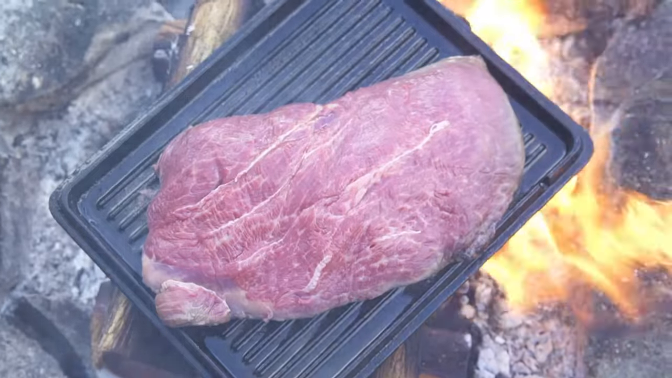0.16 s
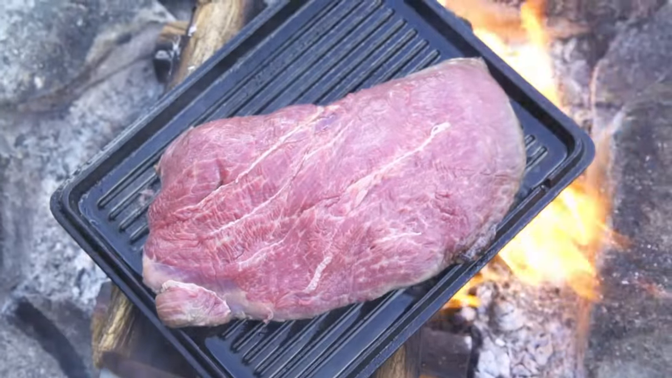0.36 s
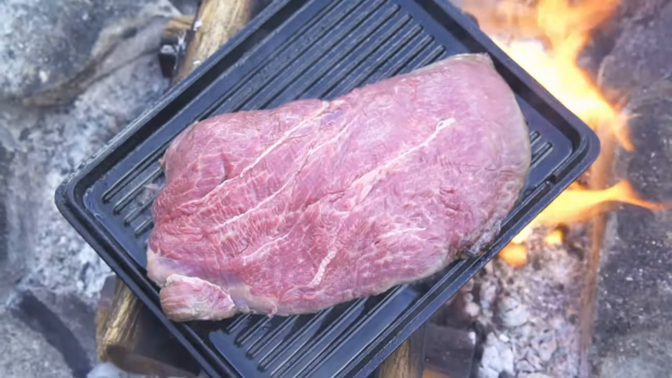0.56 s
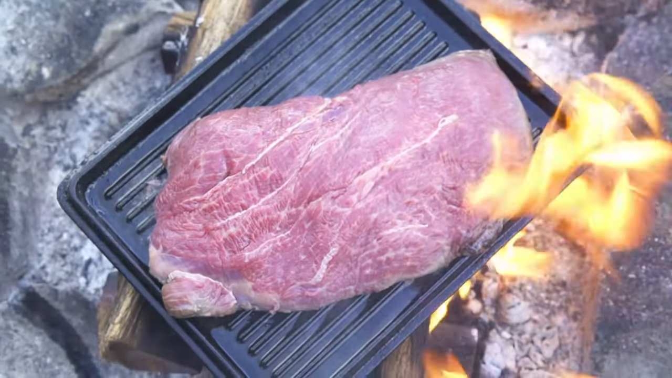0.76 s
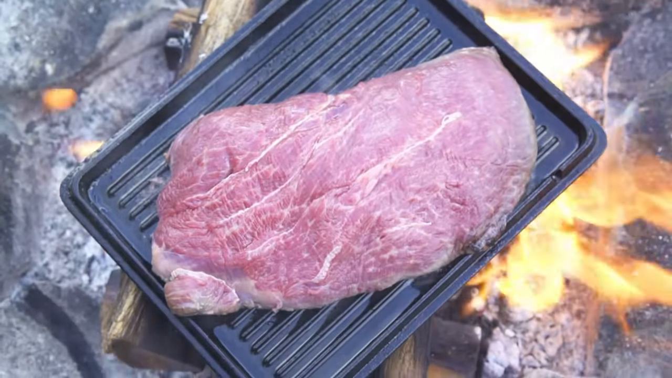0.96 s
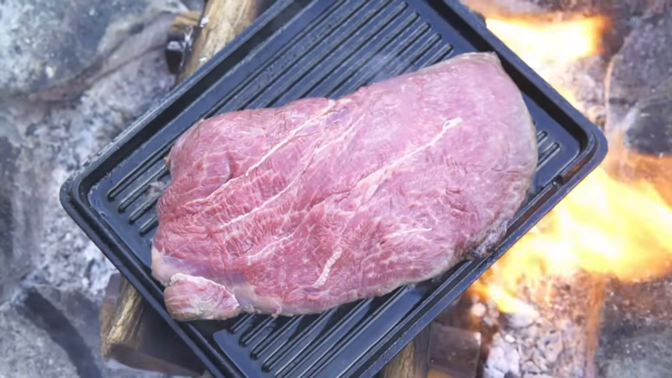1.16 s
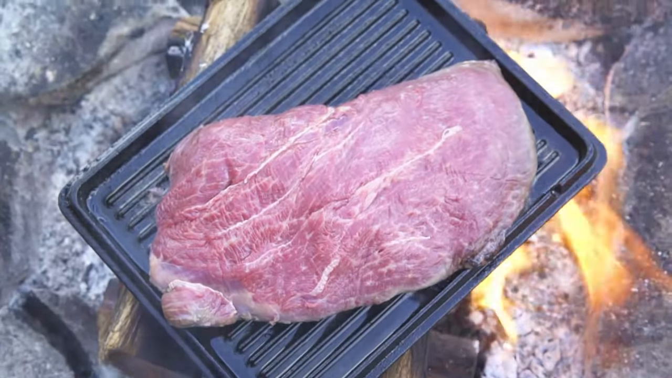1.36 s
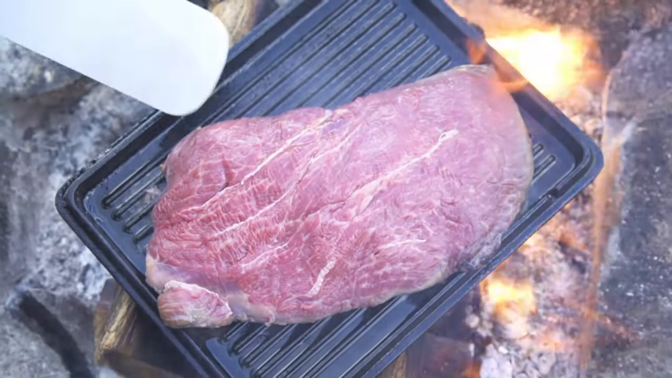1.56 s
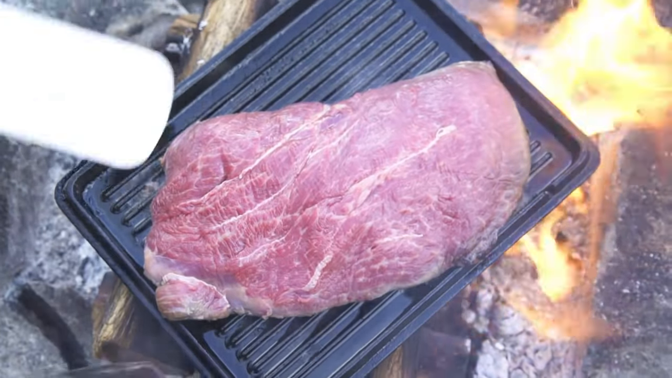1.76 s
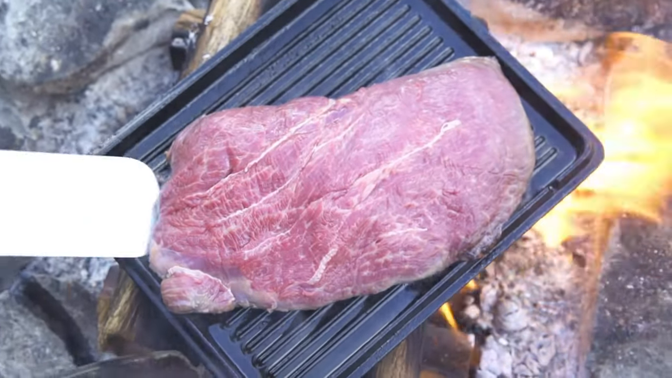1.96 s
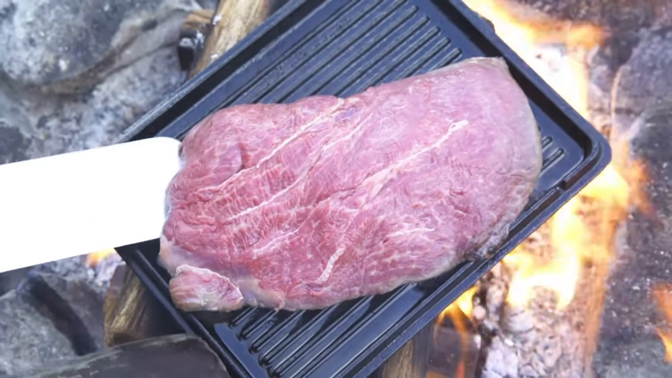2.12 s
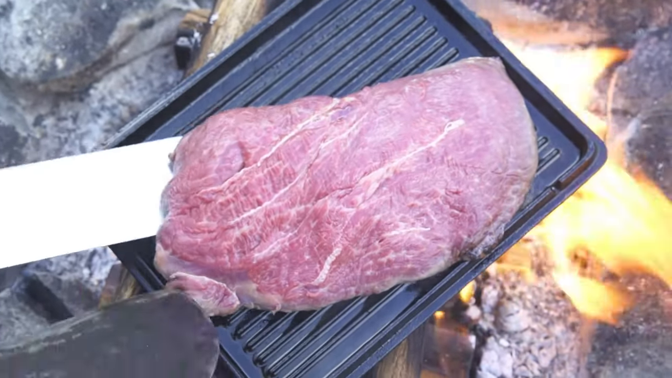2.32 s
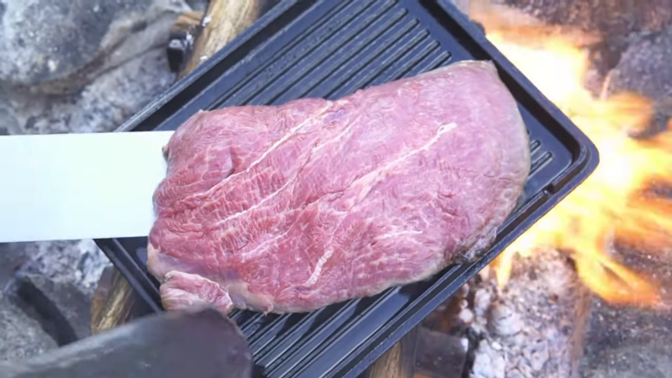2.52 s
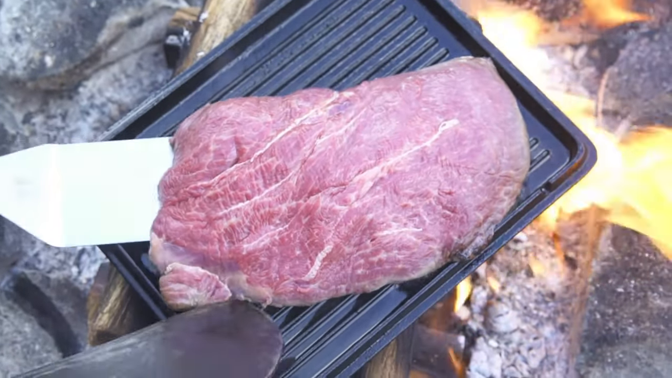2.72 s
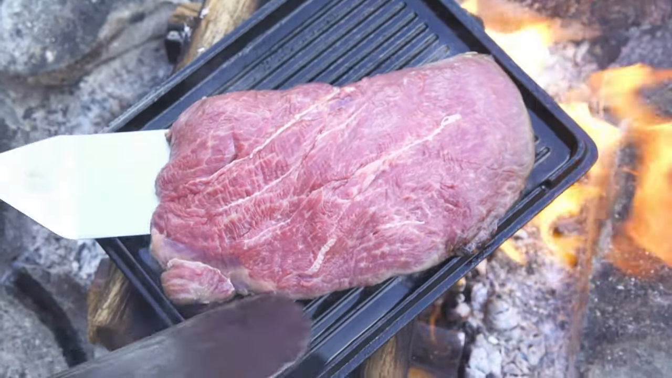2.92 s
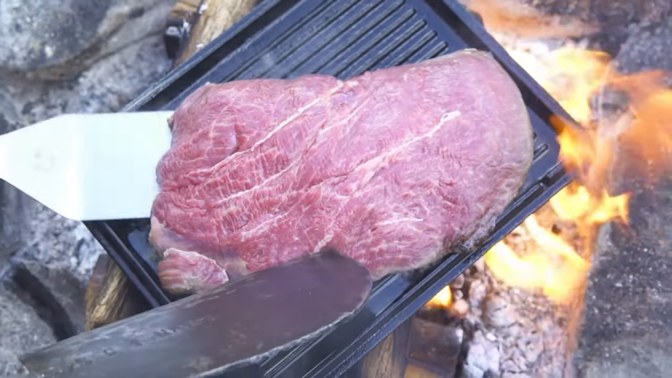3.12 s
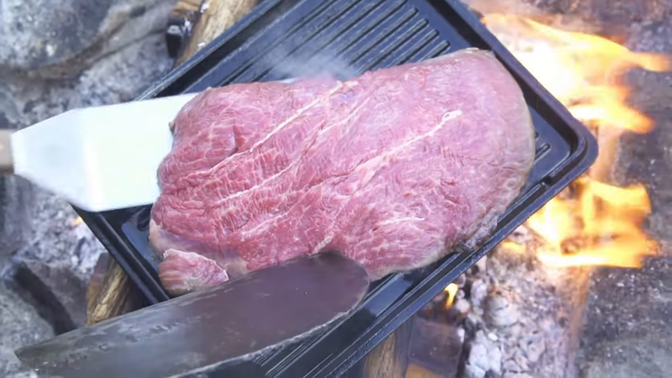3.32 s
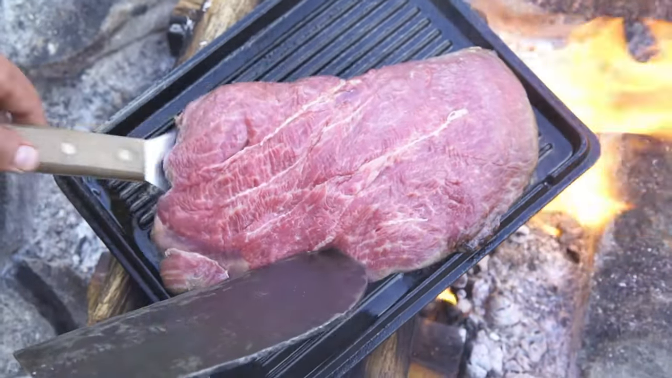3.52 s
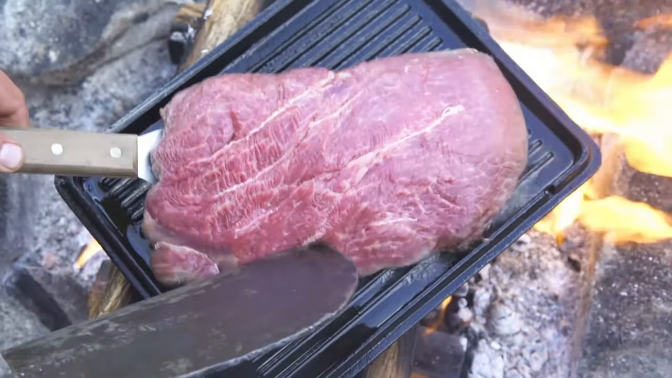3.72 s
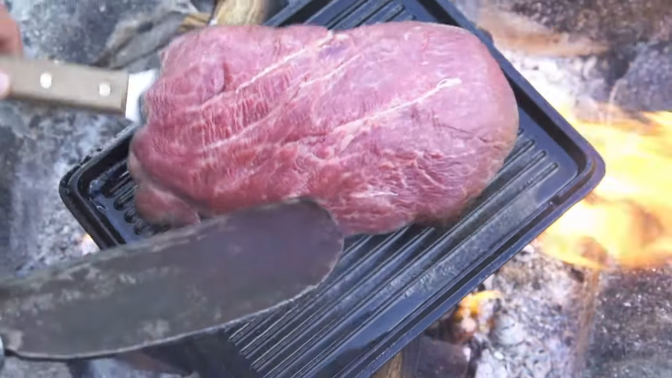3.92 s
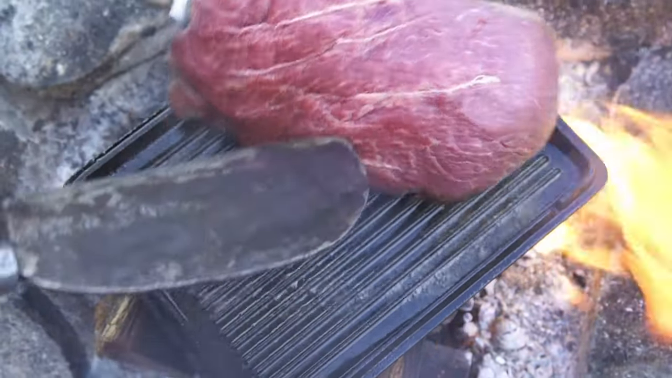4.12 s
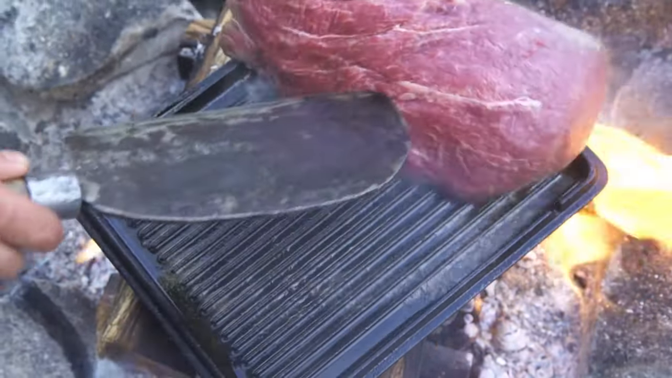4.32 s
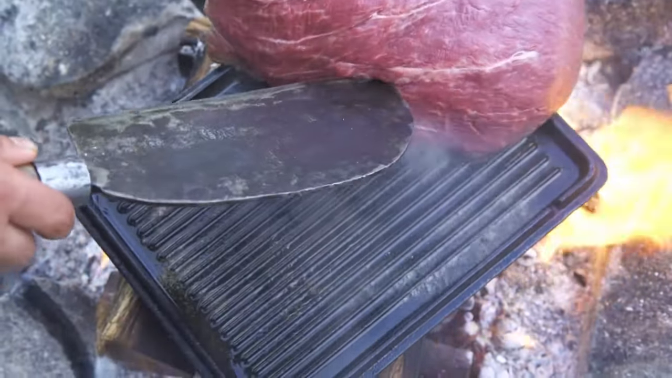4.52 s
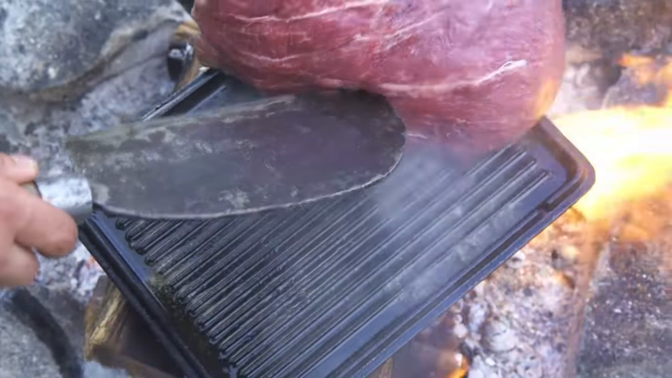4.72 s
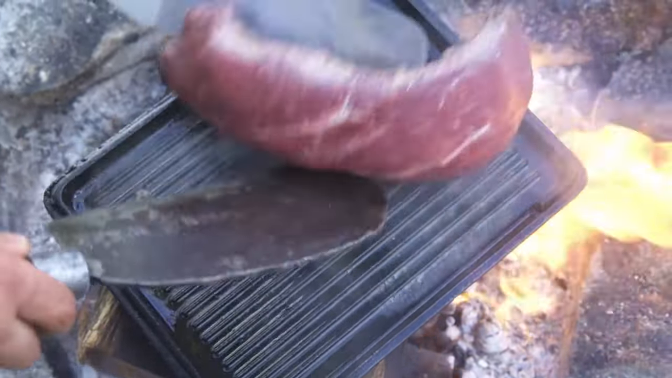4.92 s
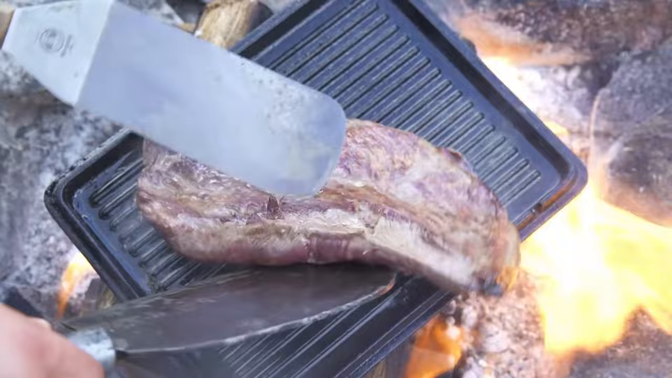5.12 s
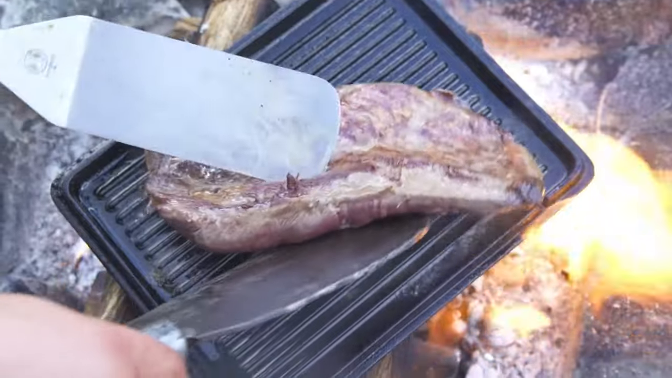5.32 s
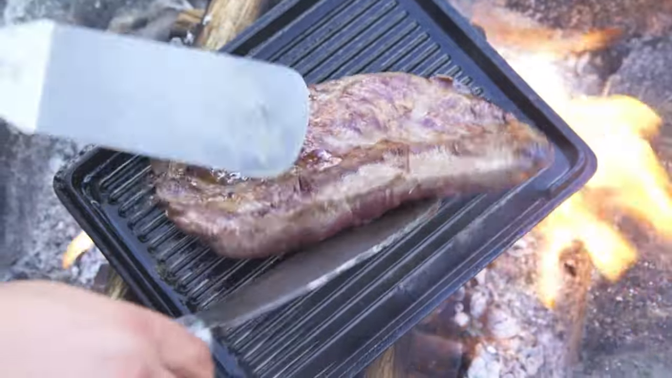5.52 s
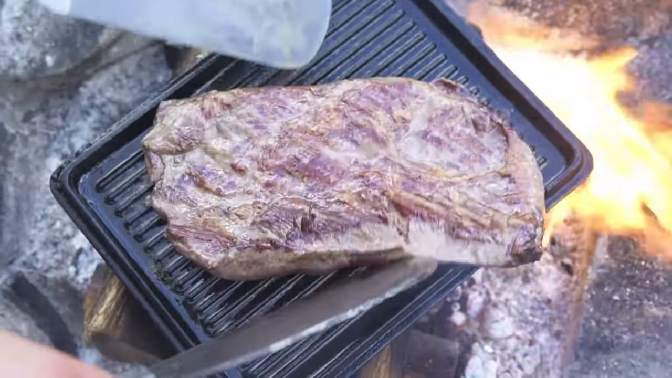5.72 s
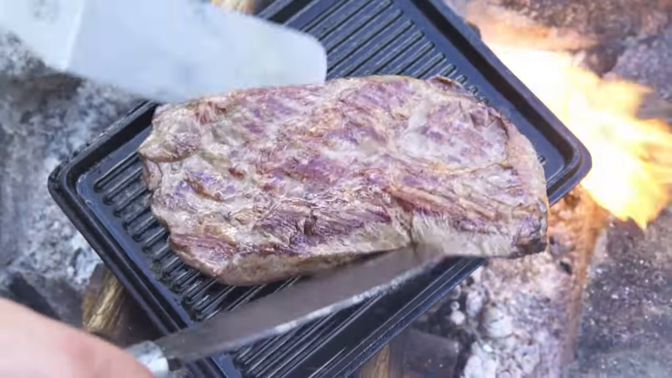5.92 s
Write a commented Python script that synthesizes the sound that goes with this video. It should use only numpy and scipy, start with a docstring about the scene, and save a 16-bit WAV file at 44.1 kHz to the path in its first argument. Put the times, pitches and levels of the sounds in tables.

```python
"""At a campfire, a steak sizzles on a ridged iron pan: tiny steam bursts in the fat, with louder pops
among them and short jets of steam from under the meat. A steel spatula and a knife scrape and knock
on the pan and turn the steak over; the wet side lands and spits harder.
The flames rumble underneath, with ticking embers and a few dull knocks."""
import sys
import numpy as np
from scipy import signal
from scipy.fft import rfft, irfft, next_fast_len
from scipy.io import wavfile
from scipy.ndimage import map_coordinates

SR = 44100
rng = np.random.default_rng(int(sys.argv[2]) if len(sys.argv) > 2 else 0)


def transcribe(u):
    """Save the signal u as a 16-bit wav file named by the first command-line argument.

    u: samples, shape (n,) or (channels, n), limited to [-1, 1]; the rate is SR.
    q: integer samples, one column per channel.
    """
    v = np.clip(np.atleast_2d(u).T, -1, 1)
    q = np.round(v * 32767).astype(np.int16)
    wavfile.write(sys.argv[1], SR, q)


N = 267642
TIME = np.arange(N) / SR
DROPLET_HZ = 6950  # usual pitch of a bursting droplet
# how hard the pan fries: (time [s], crackle level [dB], fizz level [dB], bubbling level [dB])
FRYING_LEVELS = [(0.08, -41, -40.5, -40), (0.11, -43.5, -49, -46), (0.28, -33.5, -43, -55),
                 (0.46, -37, -44.5, -53), (0.66, -36, -41.5, -42), (0.73, -42.5, -49, -40),
                 (0.85, -35.5, -43.5, -46), (1.66, -37, -42.5, -41), (1.86, -36.5, -37.5, -33.5),
                 (2.09, -36.5, -40, -43), (3.39, -33.5, -39, -37), (4.21, -37.5, -42, -41),
                 (5.01, -33.5, -36.5, -32.5), (5.41, -30.5, -34, -31.5), (5.53, -32, -37, -37.5),
                 (5.66, -26.5, -39, -34), (5.76, -34.5, -44, -30.5), (6.06, -32.5, -45, -33)]


def amp(db):
    """Decibels to gain."""
    return 10 ** (np.asarray(db) / 20)


def unit(x):
    """Scale to rms 1."""
    return x / np.sqrt(np.mean(x ** 2) + 1e-20)


def curves(rows):
    """Breakpoint envelopes, one for each column after the time."""
    times, *columns = np.transpose(rows)
    return [np.interp(TIME, times, column) for column in columns]


def wobble(rate):
    """A smooth random curve, rate knots a second."""
    return map_coordinates(rng.standard_normal(4096), [TIME * rate], mode="wrap")


def swell(start, end):
    """A rounded rise and fall between two times."""
    return np.sqrt(np.abs(np.sin(np.pi * np.clip((TIME - start) / (end - start), 0, 1))))


def coloured(x, points):
    """Minimum-phase EQ through (Hz, dB) points, so that clicks keep their sharp attack."""
    size = 2 * next_fast_len(N // 2 + 4096)
    hz, db = np.transpose(points)
    gain = amp(np.interp(np.log(np.fft.rfftfreq(size, 1 / SR) + 1), np.log(hz), db))
    cepstrum = irfft(np.log(gain))
    cepstrum[1:size // 2] *= 2
    cepstrum[size // 2 + 1:] = 0
    return irfft(rfft(x, size) * np.exp(rfft(cepstrum)))[:N]


def resonance(x, hz, q):
    """One resonant band-pass, with Q no lower than 0.5."""
    return signal.lfilter(*signal.iirpeak(min(hz, SR / 2 - 1000), max(q, .5), SR), x)


def add(track, start, sound):
    """Mix a sound in at a start time in seconds."""
    part = track[max(round(start * SR), 0):][:len(sound)]
    part += sound[:len(part)]


def bursts(count, hz, scatter, cycles, range_db):
    """A swarm of tiny bursts, each a quickly damped sine: many faint, few strong."""
    when, size, life = rng.random((count, 3)).T
    onsets = (when * N).astype(int)
    pitch = np.broadcast_to(hz, N)[onsets] * np.exp(scatter * rng.standard_normal(count))
    db = range_db * np.tanh(-np.log(1 - size) / 6)
    age = np.arange(128)
    turns = np.clip(pitch, 300, 16000)[:, None] * age / SR
    decay = np.exp(-turns / (cycles * (.5 + life[:, None])))
    grains = rng.choice([-1, 1], (count, 1)) * amp(db)[:, None] * np.sin(2 * np.pi * turns) * decay
    return np.bincount((onsets[:, None] + age).ravel(), grains.ravel(), N)[:N]


def fire():
    """Flames rumble low and flutter more the harder they burn; the embers tick faintly."""
    # a calm burn, harder as the steak is turned: (time [s], level [dB])
    burn = [(0.1, -57.5), (1.5, -51.5), (3.4, -57.5), (5.4, -46), (6.06, -48)]
    # flames flaring up: (start [s], end [s], boost [dB])
    flares = [(0.552, 0.74, 6), (0.93, 1.156, 5), (1.186, 1.443, 8.5), (4.44, 4.58, 4.5)]
    # low body of the flames: (frequency [Hz], gain [dB])
    rumble_eq = [(15, -2.5), (30, -17), (50, -0.5), (75, 1.5), (120, 2), (200, -6.5), (400, -24.5),
                 (1000, -27.5)]
    # their midrange flapping: (frequency [Hz], gain [dB])
    flutter_eq = [(80, -10), (200, -3), (310, -2), (480, -5), (750, -11.5), (1100, -12.5), (2000, -9),
                  (5000, -49.5)]
    # ticking of the embers: (time [s], level [dB])
    ember_levels = [(0, -53.5), (2.5, -48), (3.8, -51.5), (6, -56.5)]
    licks_db = wobble(rate=8)
    flame_db = curves(burn)[0] + licks_db + sum(db * swell(start, end) for start, end, db in flares)
    rumble = unit(coloured(rng.standard_normal(N), rumble_eq) * amp(0.85 * wobble(22)))
    flutter = unit(coloured(rng.standard_normal(N), flutter_eq) * amp(2.54 * wobble(30)))
    ticks = bursts(count=5000, hz=1515, scatter=0.39, cycles=0.97, range_db=19.5)
    embers = amp(curves(ember_levels)[0]) * unit(resonance(ticks, 2430, q=0.5))
    return amp(flame_db + 2.1) * rumble + (amp(-52) + 0.36 * amp(flame_db)) * flutter + embers


def knocks():
    """Dull blows: a brief push into one well-damped resonance."""
    # knocks around the pan and the fire: (time [s], peak [dB], pitch [Hz], t60 [s])
    blows = [(0.477, -33.5, 328, 0.12), (1.114, -27.5, 1030, 0.047), (1.114, -27.5, 570, 0.015),
             (1.685, -28.5, 303, 0.089), (2.329, -18, 1950, 0.0071), (2.512, -27, 960, 0.046),
             (2.565, -42, 430, 0.039), (3.117, -32.5, 226, 0.07), (4.006, -29.5, 220, 0.039),
             (4.424, -23.5, 410, 0.0076), (4.463, -37, 510, 0.058), (4.547, -35, 804, 0.032),
             (5.279, -24, 2440, 0.0052), (5.777, -40, 234, 0.05)]
    out, t = np.zeros(N), TIME[:SR // 5]
    attack = 1 - np.exp(-t / 0.0004)
    for start, db, hz, t60 in blows:
        rattle = unit(resonance(rng.standard_normal(len(t)), hz, q=0.98))
        body = (np.sin(2 * np.pi * hz * t) + 0.38 * rattle) * amp(-60 * t / t60) * attack
        add(out, start, amp(db) * body / np.abs(body).max())
    return out


def pan_ring(damping):
    """The pan's answer to one blow, a new mix of modes each time; more damping shortens the ring."""
    # pan and blade ringing together: (frequency [Hz], level [dB], t60 at damping 1 [s])
    modes = [(687, -2, 0.073), (775, -10, 0.063), (992, -4, 0.11), (1218, -2.5, 0.17), (1342, 3, 0.14),
             (1460, 3, 0.053), (1843, 3, 0.12), (1970, -14, .1), (2020, -8, 0.058), (2266, 7, 0.17),
             (2820, 2, 0.068), (3210, -4, 0.033), (3360, 10, 0.1), (3460, 0.5, 0.18), (4050, 5, 0.093),
             (4660, -23, .08), (5330, 17, 0.065), (5300, -10, 0.065)]
    t = TIME[:SR // 4]
    hz, db, t60 = np.transpose(modes)[:, :, None]
    envelopes = amp(db + rng.standard_normal(db.shape) - 60 * damping * t / t60)
    return np.sum(rng.choice([-1, 1], db.shape) * envelopes * np.sin(2 * np.pi * hz * t), axis=0)


def scrapes():
    """Steel sticks and slips on the ridges, rasping and ringing the pan."""
    # blades rubbing over iron and meat:
    # (start [s], end [s], level [dB], centre [Hz], sharpness [Q], ringing share [0-1])
    strokes = [(0.18, 0.273, -45.5, 650, 0.45, 0), (0.464, 0.526, -44.5, 550, 0.69, 0.3),
               (1.128, 1.303, -45.5, 470, 0.88, 0.05), (1.24, 1.303, -39.5, 900, 0.44, 0.36),
               (1.556, 1.803, -48.5, 397, 0.82, 0.3), (1.767, 1.955, -43.5, 1150, 1.3, 0.65),
               (1.795, 1.99, -36, 3240, 0.74, 0.5), (1.883, 1.984, -40, 2180, 0.8, 0.85),
               (2.156, 2.337, -46, 2020, 3.4, .1), (2.34, 2.415, -38.5, 1840, 1.8, 0),
               (2.458, 2.637, -38, 1230, 0.44, 0.2), (2.463, 2.63, -41.5, 458, 1.3, 0.18),
               (2.738, 2.794, -44.5, 700, 0.36, 0.2), (3.198, 3.287, -48, 484, 3, 0.04),
               (3.39, 3.507, -39.5, 1830, 1.1, 0.5), (3.515, 3.63, -44.5, 1510, 1.1, 0.95),
               (4.643, 4.738, -46, 400, 0.45, 0.15), (5.16, 5.24, -43, 1920, 2.1, 0.2),
               (5.87, 6.04, -37.5, 3140, 1.9, 0.3), (5.886, 6.035, -44.5, 1800, 8.4, 0.5),
               (5.887, 6.03, -45.5, 692, 12, 0.8)]
    slips = bursts(count=7000, hz=2740, scatter=0.71, cycles=0.21, range_db=1)
    slips = unit(slips * amp(3 * wobble(70)))
    # the moving edge touches the pan at changing places, so the mix of modes shifts
    place = 1.18 * wobble(20)
    ringing = sum(weight * signal.fftconvolve(slips, pan_ring(damping=2))[:N]
                  for weight in (np.cos(place), np.sin(place)))
    out = np.zeros(N)
    for start, end, db, hz, q, share in strokes:
        envelope = swell(start, end)
        for source, weight in ((slips, np.sqrt(1 - share)), (ringing, np.sqrt(share))):
            rasp = envelope * resonance(resonance(source, hz, q), hz, q)
            out += amp(db) * weight * rasp * np.linalg.norm(envelope) / np.linalg.norm(rasp)
    return out


def taps():
    """Steel strikes the pan with a crack and a ring; a slower contact leaves out the high modes."""
    # blade hits: (time [s], ring peak [dB], contact cut-off [Hz], crack gain [dB])
    hits = [(2.106, -15.5, 3100, -10), (2.129, -21, 1680, -6), (3.194, -31, 4500, 19.5),
            (3.242, -32, 4500, 18), (5.349, -37, 450, -24), (5.543, -35, 445, -31)]
    out = np.zeros(N)
    for start, db, contact_hz, crack_db in hits:
        contact = signal.butter(2, contact_hz, fs=SR)
        ring = signal.lfilter(*contact, pan_ring(damping=0.88))
        noise = rng.standard_normal(len(ring)) * amp(crack_db - 60 * TIME[:len(ring)] / 0.046)
        crack = signal.lfilter(*contact, resonance(noise, 3800, q=0.96))
        add(out, start, amp(db) * (ring / np.abs(ring).max() + crack))
    return out


def steam_jets():
    """Trapped steam forces its way out in a dense chain of bubbles around one pitch."""
    # squirts from under the meat: (start [s], end [s], level [dB], pitch [Hz])
    jets = [(3.317, 3.423, -33.5, 7600), (4.094, 4.142, -29.5, 7200), (5.155, 5.257, -32, 3830),
            (5.327, 5.436, -27.5, 8400), (5.62, 5.743, -31.5, 3860)]
    out = np.zeros(N)
    chain = bursts(count=24000, hz=6040, scatter=0.16, cycles=0.4, range_db=37)
    for start, end, db, hz in jets:
        out += amp(db) * swell(start, end) * unit(resonance(resonance(chain, hz, q=3.9), hz, q=3.9))
    return out


def droplet(hz, lag, thinness):
    """A droplet bursts with a sharp edge and a brief ring; a weaker burst follows at once. Peak 1."""
    t = TIME[:400]
    cycles = 1.08 * DROPLET_HZ / hz  # larger, lower droplets ring for more cycles
    ring = np.sin(2 * np.pi * hz * t) * np.exp(-hz * t / cycles)
    splash = rng.standard_normal(len(t)) * (.25 * np.exp(-t / .0002) + .06 * np.exp(-t / .0018))
    # so small a source radiates little below its own pitch
    low_cut = signal.butter(2, hz * (.3 + .35 * thinness), "high", fs=SR)
    pop = signal.lfilter(*low_cut, ring + splash)
    add(pop, .0003 + .0008 * lag, .4 * pop)
    return pop / np.abs(pop).max()


def spits(count):
    """Lesser droplets at random, riding above the crackle: (time [s], peak [dB], pitch [Hz])."""
    crackle_db = curves(FRYING_LEVELS)[0]
    when, size = rng.random((count, 2)).T
    db = crackle_db[(when * N).astype(int)] + 13.5 + 7 * size
    hz = np.clip(DROPLET_HZ * np.exp(0.3 * rng.standard_normal(count)), 4440, SR / 4)
    return list(zip(when * N / SR, db, hz))


def pops():
    """Fat droplets burst: a few loud accents among many lesser spits."""
    # the loudest droplets: (time [s], level [dB], pitch [Hz])
    accents = [(0.0754, -19, 5220), (0.197, -10.5, 8640), (0.2473, -17, 4680), (0.411, -12, 7100),
               (0.4995, -9.5, 7300), (0.654, -9, 8600), (0.6664, -9, 7750), (0.8806, -10.5, 7750),
               (0.9203, -12, 4700), (1.0045, -11, 9600), (1.0286, -12, 5690), (1.3585, -7, 7900),
               (1.4323, -11, 8010), (1.4785, -11, 8080), (1.8253, -9, 7260), (2.0358, -12, 3800),
               (2.388, -5.5, 4960), (2.6012, -9.5, 5070), (2.622, -8, 4900), (2.6942, -6, 7500),
               (2.795, -4.5, 5800), (2.8203, -9, 7820), (2.9465, -9, 7240), (3.5134, -4, 7900),
               (3.6676, -8.5, 6540), (3.7102, -3, 7400), (4.077, -7, 7390), (4.2532, -10, 4800),
               (4.2792, -12, 8000), (4.5736, -3, 4520), (4.8147, -10, 8630), (5.0174, -12, 8580),
               (5.0604, -9, 7680), (5.227, -10.5, 4070)]
    trim_db, delay_s = -2, 0.0011  # each loud pop sounds about a millisecond after its listed time
    loud = [(start + delay_s, db + trim_db, hz) for start, db, hz in accents]
    out = np.zeros(N)
    for start, db, hz in loud + spits(count=120):
        add(out, start, amp(db) * droplet(hz, *rng.random(2)))
    return out


def flurries(count, decay_s):
    """An envelope of fresh juice drops: each flares up at once and boils away within milliseconds."""
    when, size = rng.random((count, 2)).T
    drops = np.bincount((when * N).astype(int), size ** 2, N)
    return unit(signal.lfilter([1], [1, -np.exp(-1 / (decay_s * SR))], drops))


def sizzle():
    """Crackling fat, a fine fizz of steam, lower bubbling juice and bubbles singing under the steak."""
    # bright crackle of the fat: (frequency [Hz], gain [dB])
    crackle_eq = [(200, -34), (800, -20.5), (1500, -11.5), (2500, -8.5), (3500, -3.5), (4700, -1.5),
                  (6500, 3), (8100, 4.5), (9500, 3), (11500, -7.5), (16000, 4)]
    # airy top of the steam: (frequency [Hz], gain [dB])
    fizz_eq = [(3000, -24), (7000, -9.5), (9000, 3.5), (11500, 3.5), (14000, 1), (16000, -2)]
    # wet midrange of the juice: (frequency [Hz], gain [dB])
    bubbling_eq = [(600, -47), (1400, -40), (1900, -9), (2500, -6.5), (3200, -5), (4000, -3), (5000, 2.5),
                   (8000, -19.5)]
    # hiss of the flooded pan: (frequency [Hz], gain [dB])
    hiss_eq = [(300, -41), (1400, -40), (2500, -12), (4500, -4), (7000, -3.5), (9000, -6), (12000, -15),
               (16000, -39)]
    # the gap under the steak opens as the spatula slides in and sings higher as it closes:
    # (time [s], resonance [Hz], level [dB])
    gap = [(0.1, 7800, -66), (1.4, 8000, -46.5), (2.0, 5100, -44), (3.0, 6360, -44.5), (3.9, 7000, -40.5),
           (4.15, 7700, -42), (4.55, 8200, -38), (5.35, 8240, -36), (6.06, 8350, -61)]
    # juice spreading over the bare iron: (time [s], flooded share [0-1])
    flood = [(4.45, 0.09), (4.75, 0.07), (5.5, 0.83), (5.8, 0.62)]
    lift_s, land_s = 4.33, 4.94
    crackle_db, fizz_db, wet_db = curves(FRYING_LEVELS)
    gap_hz, gap_db = curves(gap)
    flooded, = curves(flood)
    fat = bursts(count=26000, hz=6500, scatter=.6, cycles=.7, range_db=26)
    steam = bursts(count=30000, hz=12900, scatter=.19, cycles=.71, range_db=9.5)
    juice = bursts(count=14000, hz=3850, scatter=.24, cycles=1.4, range_db=18)
    singing = amp(gap_db) * unit(bursts(count=6000, hz=gap_hz, scatter=.05, cycles=4, range_db=18))
    # as juice floods the iron, the bursts merge into a smoother hiss
    hiss = unit(coloured(rng.standard_normal(N), hiss_eq))
    frying = np.sqrt(1 - flooded) * unit(coloured(fat, crackle_eq)) + np.sqrt(flooded) * hiss
    crackle = amp(crackle_db + 0.48) * frying
    # a flooded pan steams more, and nothing muffles the fizz while the steak is off the iron
    fizz_db += flooded + 3 * swell(lift_s, land_s)
    fizz = amp(fizz_db + 0.5) * unit(coloured(steam, fizz_eq))
    bubbling = amp(wet_db - 4) * unit(coloured(juice, bubbling_eq))
    sputter = unit(1 + 0.41 * (1 - flooded) * flurries(count=2500, decay_s=0.0015))
    surge = amp(0.53 * wobble(rate=9))
    return surge * sputter * (crackle + fizz + bubbling + singing)


def scene():
    """A mono mix, close and in the open air, without echo."""
    return (sizzle() + pops() + steam_jets() + scrapes() + taps() + knocks() + fire())[None]


def record(dry):
    """The sound cuts in after a moment of silence; a brick-wall low-pass takes off the very top."""
    start_s, top_hz = 0.063, 15850
    size = next_fast_len(N + SR // 2)
    passband = np.fft.rfftfreq(size, 1 / SR) < top_hz
    return irfft(rfft(dry * (TIME > start_s), size) * passband, size)[..., :N]


dry = scene()
out = record(dry)
transcribe(out)
```